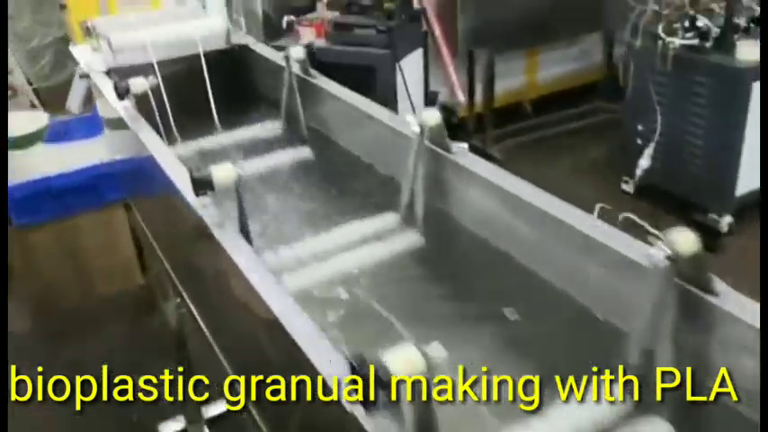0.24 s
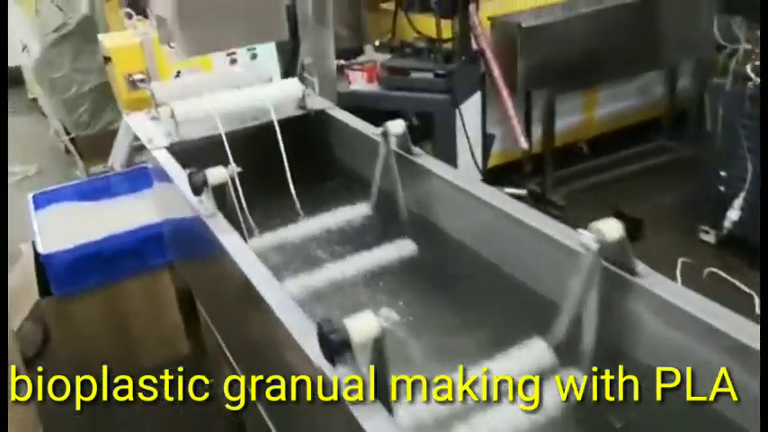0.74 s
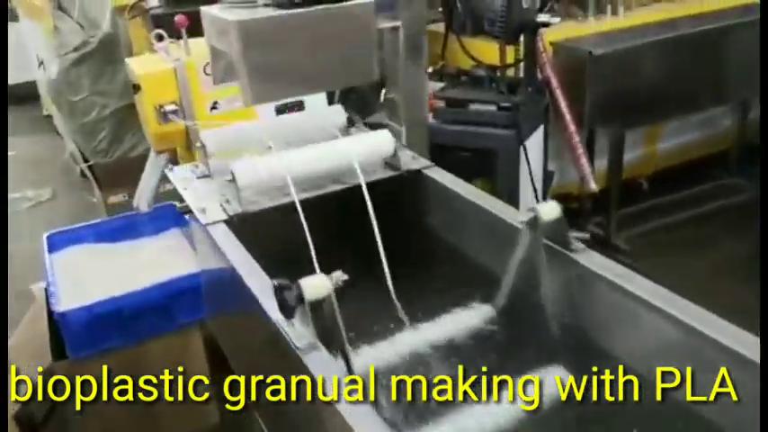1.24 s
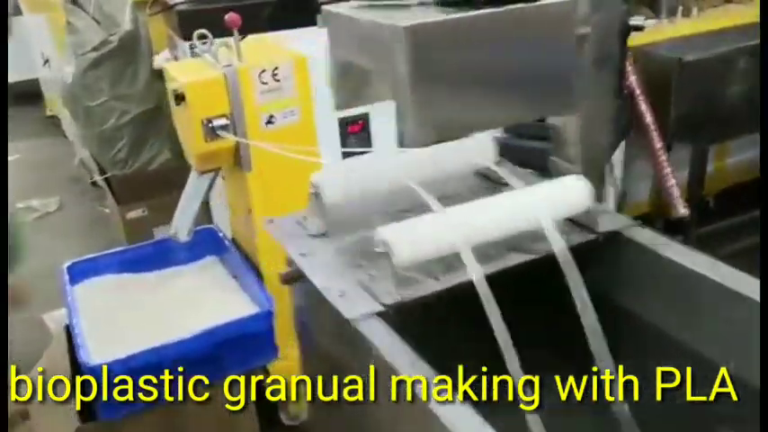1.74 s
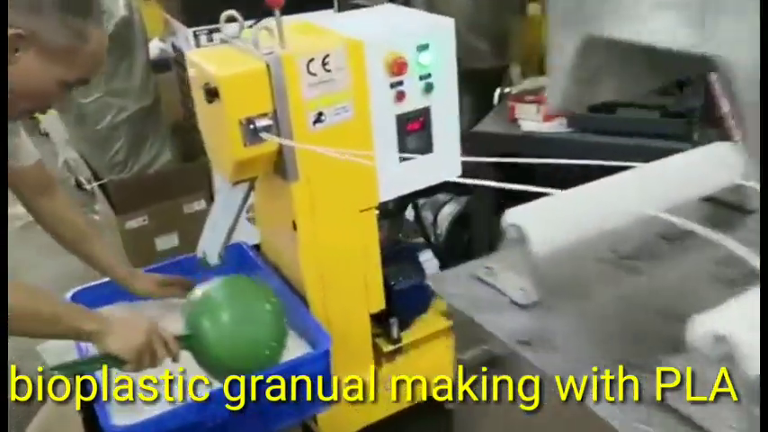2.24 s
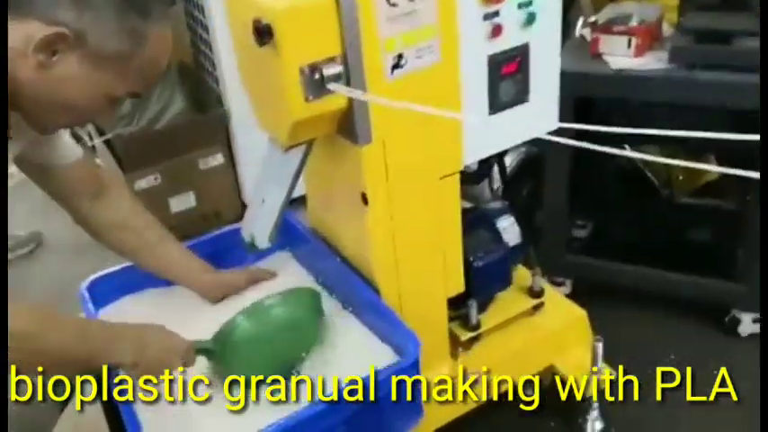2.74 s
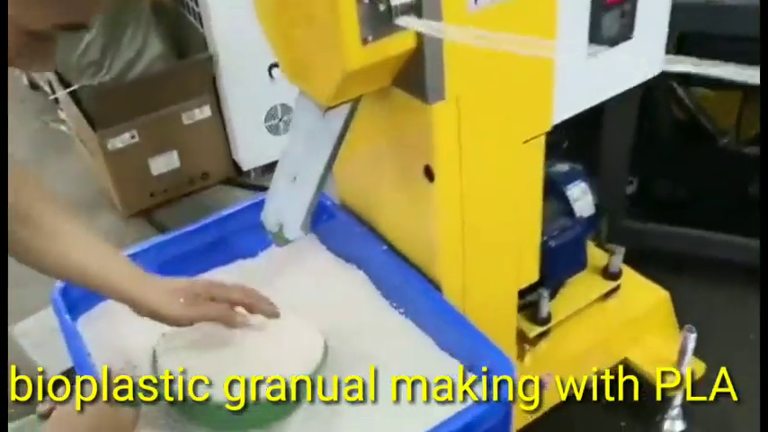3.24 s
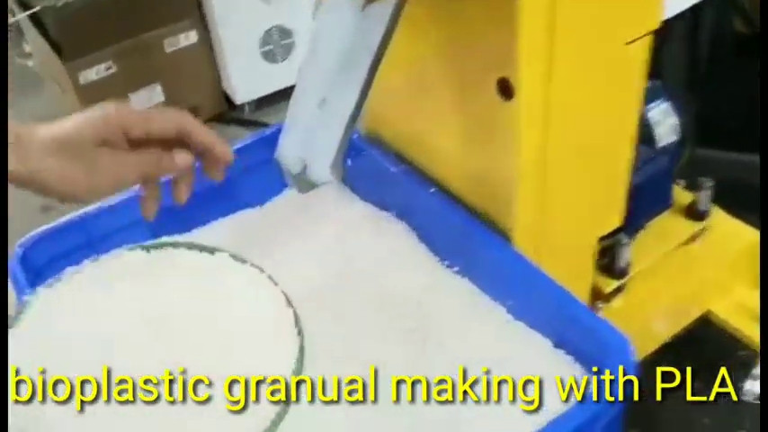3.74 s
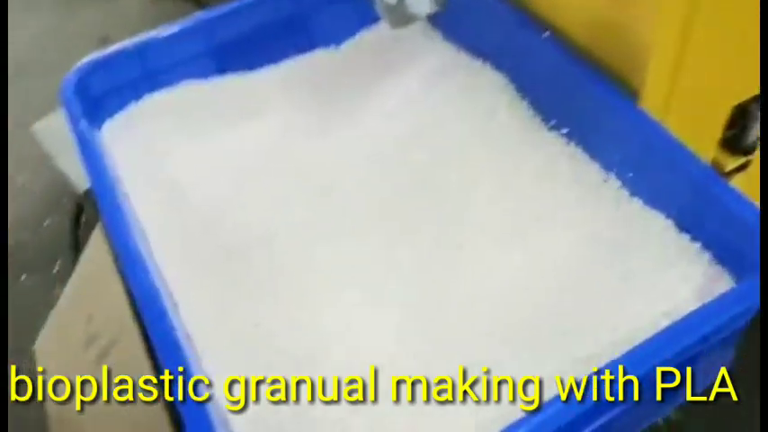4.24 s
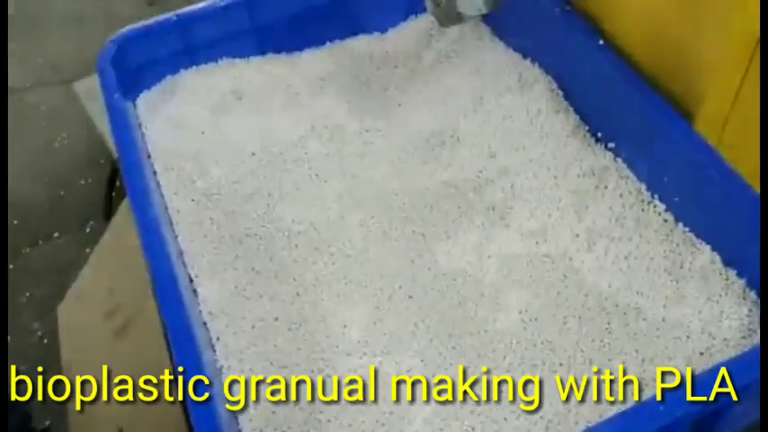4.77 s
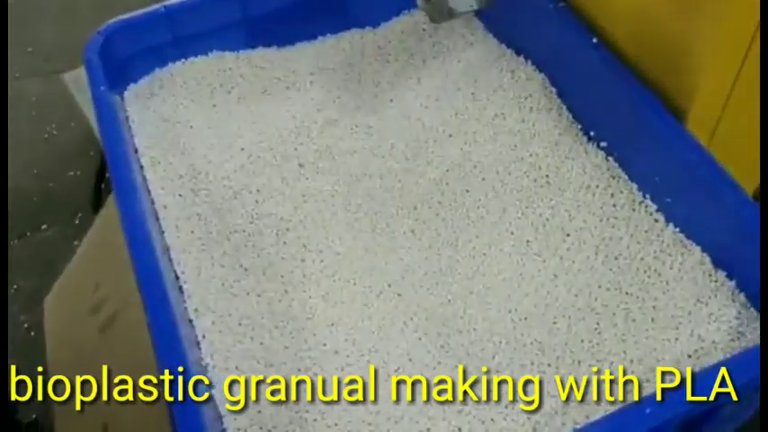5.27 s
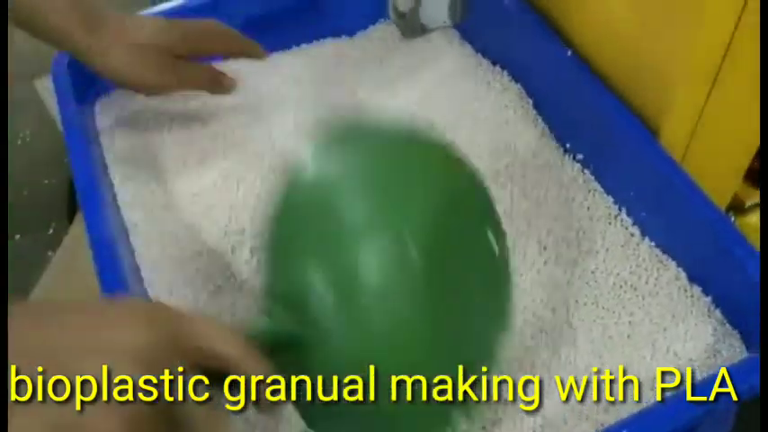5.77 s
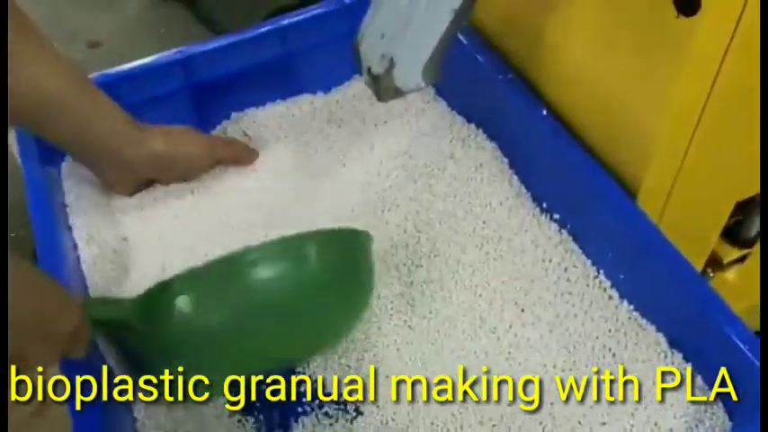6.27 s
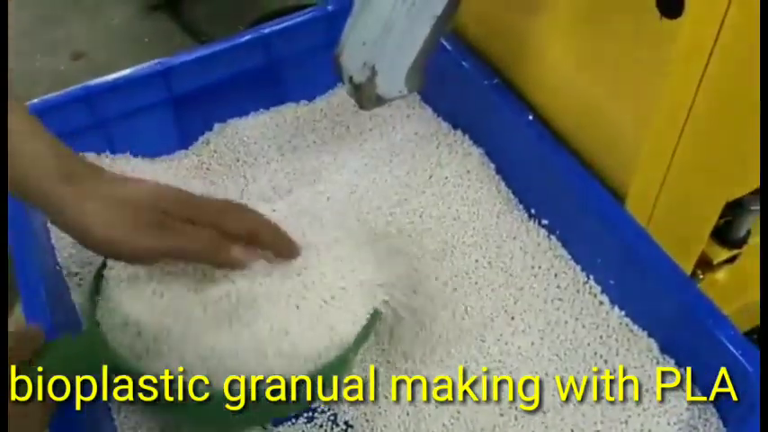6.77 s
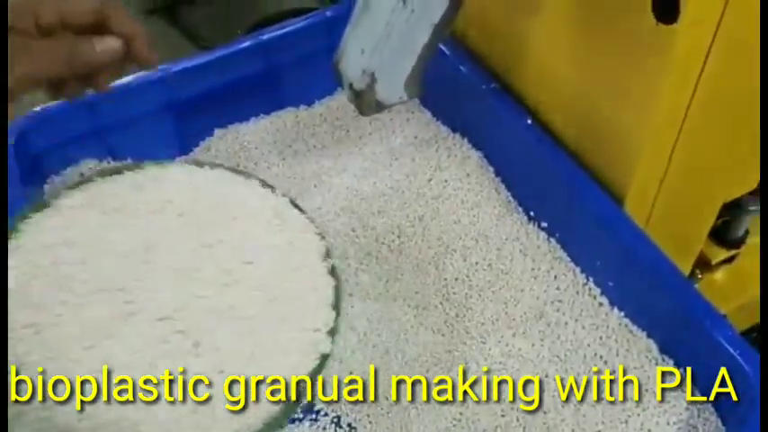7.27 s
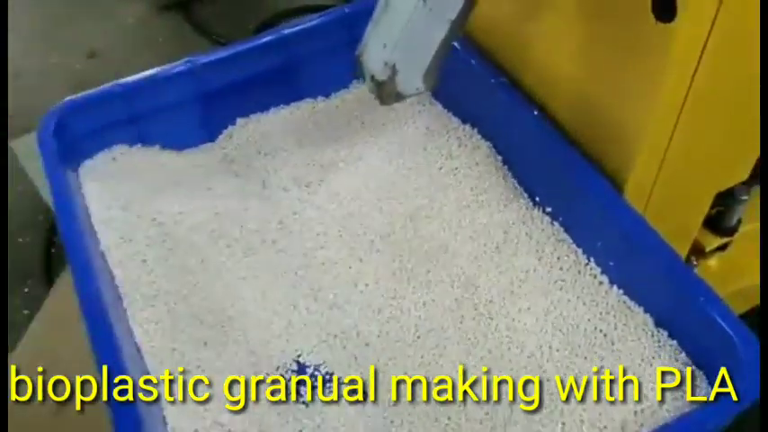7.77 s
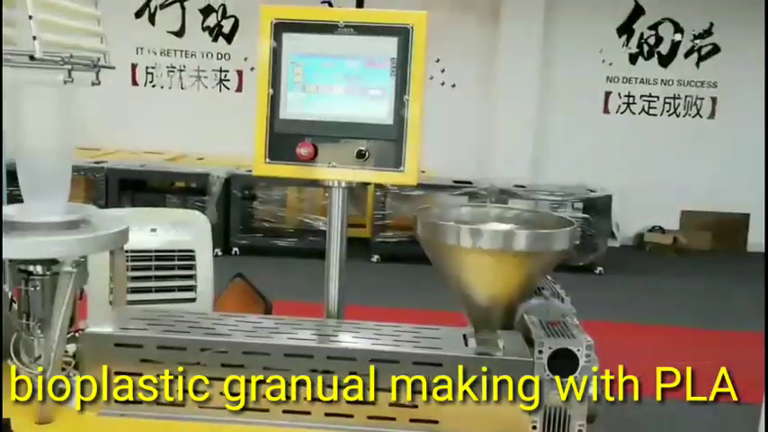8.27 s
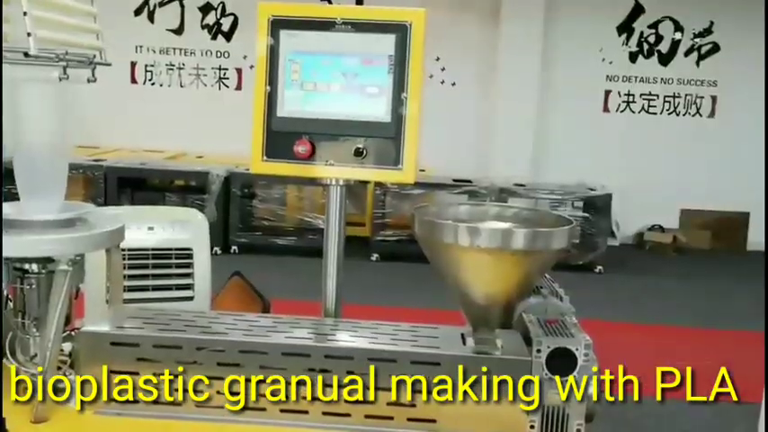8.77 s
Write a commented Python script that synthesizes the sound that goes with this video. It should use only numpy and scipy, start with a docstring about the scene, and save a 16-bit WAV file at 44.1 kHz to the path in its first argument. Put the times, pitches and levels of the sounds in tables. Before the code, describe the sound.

The microphone moves up to a plastic pellet cutter, whose rough chopping roar and motor whine swell over the low rumble of a factory. A fine rattle of falling pellets runs through it, joined by dull bumps, a few tiny squeals and short crunches as pellets are scooped. Everything stops abruptly near the end. After a moment of silence, a softer machine follows with a pulsing hum, fan noise and a faint high whistle.

```python
"""The harsh roar and whine of a strand pelletizer come first, over the rumble of a factory hall, and
grow as the listener walks up to it. Rotor blades chop plastic strands: the periodic blows give harmonic
tones and shake the housing. The motor sings, pellets ring a steel chute and a scoop digs into the bin.
After a short silence an extruder is heard: a throbbing hum, a fan and its inverter's thin whistle."""
import sys
import numpy as np
from scipy import signal
from scipy.fft import rfft, irfft
from scipy.io import wavfile
from scipy.ndimage import uniform_filter1d, map_coordinates

SR = 44100
rng = np.random.default_rng(int(sys.argv[2]) if len(sys.argv) > 2 else 0)


def waveform_to_disk(signal):
    """Save audio, clipped to [-1, 1], as 16-bit WAV at the path in sys.argv[1]."""
    frames = np.transpose(np.atleast_2d(signal))
    scaled = np.clip(frames, -1, 1) * 32767
    samples = np.round(scaled).astype(np.int16)
    wavfile.write(sys.argv[1], SR, samples)


N = 397341
TIME = np.arange(N) / SR
FREQS = np.arange(N // 2 + 1) * SR / N
# the walk up to the cutter and down to the bin: (time [s], distance [m])
PATH = [(0, 3), (1.1, 2.3), (2, 1.9), (2.6, 1.03), (3.4, 0.95), (4.6, 0.71), (6.9, 0.52), (8.08, 0.7)]


def undb(db):
    """Decibels to amplitude ratio."""
    return np.exp(np.asarray(db) * np.log(10) / 20)

def unit(x):
    """Normalisation to rms 1."""
    return x / np.sqrt(np.mean(x ** 2))

def curve(table):
    """Linear interpolation of (time [s], value) rows."""
    return np.interp(TIME, *np.transpose(table))

def drift(rate):
    """Smooth random modulation: spread near 1, `rate` new values a second."""
    steps = rng.standard_normal(4096)
    coarse = TIME[::32]
    return np.interp(TIME, coarse, map_coordinates(steps, [coarse * rate + 4], mode="wrap"))

def bell(s, length):
    """Gaussian pulse of height 1 at time s."""
    return np.exp(-2 * ((TIME - s) / length) ** 2)

def swells(table):
    """Envelope of superposed Gaussian pulses."""
    return sum(undb(db) * bell(s, length) for s, length, db in table)

def low_pass(x, hz):
    """Steep elliptic low-pass."""
    return signal.sosfilt(signal.ellip(16, .1, 90, hz, fs=SR, output="sos"), x)

def colour(x, spectrum):
    """Spectral shaping to rms 1, rolling off beyond the table's ends."""
    hz, db = np.transpose(spectrum)
    f = np.maximum(FREQS, 1)
    gain = undb(np.interp(np.log(f), np.log(hz), db))
    skirts = np.minimum(f / hz[0], 1) ** 2 * np.minimum(hz[-1] / f, 1) ** 4
    return unit(irfft(rfft(x) * gain * skirts, N))

def pan(db):
    """Gains for a level difference, left minus right."""
    return undb(np.array([[.5], [-.5]]) * db)

def tone(cycles, pan_db, lead=0):
    """A sinusoid reaches two microphones with a level difference and a phase lead [rad]."""
    angle = 2 * np.pi * ((cycles + rng.random()) % 1) + np.array([[.5], [-.5]]) * lead
    return np.sqrt(2) * pan(pan_db) * np.cos(angle)

def diffuse_noise(merge_hz):
    """A diffuse field is coherent at two microphones in the bass, incoherent well above merge_hz."""
    apart = np.pi / 4 * FREQS ** 2 / (FREQS ** 2 + merge_hz ** 2)
    mid, side = rfft(rng.standard_normal((2, N)))
    return irfft(mid * np.cos(apart) + np.array([[1], [-1]]) * side * np.sin(apart), N)

def clicks(per_s, spread_db):
    """Shot noise: independent tiny impacts of uneven size."""
    hit = rng.random((2, N)) < per_s / SR
    polarity = np.sign(rng.standard_normal((2, N)))
    size_db = spread_db * np.minimum(rng.exponential(size=(2, N)), 5)
    return unit(hit * polarity * undb(size_db))

def patchy_bands(x, spread_db):
    """Amplitude modulation: narrow bands swell and fade at random, giving a patchy, shimmering colour."""
    bands = signal.stft(x, nperseg=1024)[2]
    chance = rng.standard_normal(bands.shape[1:])
    chance = uniform_filter1d(uniform_filter1d(chance, size=3, axis=0), size=4, axis=1)
    return unit(signal.istft(bands * undb(spread_db * unit(chance)), nperseg=1024)[1][:, :N])

def reflections(x, share=0.32, drift_s=0.000225):
    """Comb filtering: echoes off steel panels change their delay as the listener moves."""
    out = x.copy()
    for channel in range(2):
        for delay_s in rng.uniform(.002, .016, 3):
            out[channel] += share * np.interp(TIME - delay_s - drift_s * drift(2), TIME, x[channel])
    return unit(out)

def distance_law(at_1m_db, loss_db):
    """Level [dB] along the walk: each doubling of distance costs loss_db."""
    return at_1m_db - loss_db * np.log2(curve(PATH))

def sided(pan_db, diffuse_m=3.5):
    """Reverberation evens out the left-right difference [dB] with distance."""
    return pan_db / (1 + (curve(PATH) / diffuse_m) ** 2)

def hall(flicker_db=1.47):
    """The hall's machines sum to a diffuse rumble, which sinks as the listener leans over the bin."""
    # rumble spectrum: (frequency [Hz], relative level [dB])
    spectrum = [(20, -15.5), (45, -6), (70, -2.5), (97, 3), (130, -1.5), (190, -0.5), (300, -5),
                (450, -8.5), (560, -13)]
    # rumble along the walk: (time [s], level [dB])
    levels = [(0, -30.5), (3, -29.5), (4.9, -34.5), (5.7, -31.5), (6.7, -33.2), (8.08, -32)]
    return colour(diffuse_noise(merge_hz=263), spectrum) * undb(curve(levels) + flicker_db * drift(12))

def drive_whistle(carrier_hz=4054, spacing_hz=60, level_db=-53):
    """Modulation sidebands flank a motor drive's switching tone; each line fades on its own."""
    lines_hz = carrier_hz + spacing_hz * np.arange(-2, 3)
    return sum(undb(level_db + 2 * drift(3.1)) * tone(hz * TIME, pan_db=-3) for hz in lines_hz)

def hum(hum_hz=126, partner_hz=149, rest_db=-46.5, edge_s=.02, flutter_db=2):
    """Beating: two unsteady low tones make a rough hum that comes in throbs."""
    # throbs of the extruder: (start [s], length [s], level [dB])
    throbs = [(8.429, 0.017, -30), (8.497, .11, -29.5), (8.647, 0.206, -32), (8.893, .12, -34.5)]
    envelope = undb(rest_db)
    for s, length, db in throbs:
        inside_s = np.minimum(TIME - s, s + length - TIME)
        envelope += undb(db) * np.clip(.5 + inside_s / edge_s, 0, 1)
    lower, upper = (tone(hz * TIME + 0.12 * drift(30), pan_db=0) for hz in (hum_hz, partner_hz))
    return (lower + undb(-2) * upper) * envelope * undb(flutter_db * drift(45))

def extruder(fan_db=-32):
    """Broadband fan noise lies under the hum and the line spectrum of an inverter."""
    # fan noise: (frequency [Hz], relative level [dB])
    spectrum = [(25, -7), (70, -16), (110, -5.5), (190, -8), (320, -6), (430, -9), (520, -27.5),
                (780, -20.5), (950, -18), (2400, -17), (3100, -22), (3800, -34.5), (5900, -31), (7000, -35),
                (8200, -35)]
    # carrier, sidebands and one low line: (frequency [Hz], level [dB], left minus right [dB])
    lines = [(672, -53, -7), (7790, -55, -12), (7833, -58, 0), (7860, -52, -13), (7972, -49, -18),
             (8000, -54, -14), (8028, -45, -9), (8141, -49, 0)]
    fan = colour(diffuse_noise(merge_hz=596), spectrum) * undb(fan_db) * pan(-5.5)
    waver = .05 * drift(14)
    return fan + hum() + sum(undb(db) * tone(hz * TIME + waver, side) for hz, db, side in lines)

def crunches():
    """Pellets shoved about in the bin collide; the dense impacts fuse into a crunch."""
    # shoves: (time [s], length [s], level [dB])
    shoves = [(4.81, 0.11, -25.5), (4.96, 0.1, -26), (5.82, 0.073, -20), (6.22, 0.11, -27.5),
              (6.38, 0.063, -31.5), (7.3, 0.23, -32)]
    # impact spectrum: (frequency [Hz], relative level [dB])
    spectrum = [(400, -12.5), (800, -11), (1500, 17), (2600, 4.5), (4000, 5), (7000, -11)]
    return colour(clicks(per_s=2300, spread_db=3.5), spectrum) * swells(shoves)

def knocks():
    """Damped oscillation: the scoop, or a hand on the microphone, excites one low mode a knock."""
    # dull blows: (time [s], frequency [Hz], 60 dB decay time [s], initial level [dB])
    blows = [(3.017, 105, 0.2, -19), (4.133, 91, 0.097, -17), (4.24, 45, 0.21, -20.5),
             (4.31, 38, 0.32, -25), (5.607, 64, 0.51, -25), (5.815, 245, 0.026, -11.5),
             (5.844, 183, 0.043, -10.5)]
    out = np.zeros(N)
    age = TIME[:SR // 4]
    for s, hz, t60, db in blows:
        start = int(s * SR)
        out[start:start + len(age)] += undb(db - 60 * age / t60) * np.sin(2 * np.pi * hz * age)
    return out

def squeals(hz=7395):
    """A high tone with random phase modulation sounds in brief bursts."""
    # squeals at the cutter: (time [s], length [s], level [dB])
    bursts = [(4.13, 0.068, -34), (4.37, 0.033, -32), (6.225, 0.056, -26.5), (6.35, 0.044, -31.5),
              (6.405, 0.025, -30), (7.48, 0.044, -38)]
    return swells(bursts) * tone(hz * TIME + 0.29 * drift(80), pan_db=-10.5)

def beam(enter_s, cross_s, loss_db):
    """Directivity [dB]: a beamed tone is weak until the listener steps in front of it."""
    return -loss_db * (1 - np.tanh(2 * (TIME - enter_s) / cross_s)) / 2

def rotor(cuts, blades=16):
    """Modulation at the rotation rate, from a random starting angle."""
    return np.cos(2 * np.pi * (cuts / blades + rng.random()))

def motor(cuts, level_db=-28, flicker_db=1.7):
    """The rotor's load modulates the phase of the motor's magnetic and gear tones."""
    # motor tones: (frequency [Hz], relative level [dB], left minus right [dB], left lead [rad])
    lines = [(660, -10, -3, 1.6), (719.5, -9.5, -9, -.3), (1139.5, -2.5, -4, .3), (1169, -3, -2, -.1),
             (6150, -16, -7, 1), (7393, -22, -5, 0)]
    out = 0
    for hz, db, side, lead in lines:
        gain = undb(db + flicker_db * drift(4.1))
        cycles = hz * TIME + 0.11 * drift(27) + 0.15 * rotor(cuts)
        out += gain * tone(cycles, side, lead)
    return out * undb(level_db + beam(enter_s=2.6, cross_s=0.85, loss_db=15))

def pellets(spray_db, ring_db):
    """Impact excitation: spurts of pellets patter on the heap and ring the chute's modes."""
    # steel chute modes: (frequency [Hz], bandwidth [Hz], relative level [dB])
    modes = [(4614, 53, -3.5), (5080, 63, -1.5), (5473, 190, -5), (5748, 160, 5)]
    # pellets hitting pellets: (frequency [Hz], relative level [dB])
    spectrum = [(4300, -28.5), (4700, -6.5), (5300, -3.5), (6000, -0.5), (6800, -1), (7500, 0)]
    hits = patchy_bands(reflections(clicks(per_s=4000, spread_db=1.5)), spread_db=2)
    response = sum((-1) ** k * undb(db) / (1 + 2j * (FREQS - hz) / width)
                   for k, (hz, width, db) in enumerate(modes))
    ring = unit(irfft(rfft(hits) * response, N)) * undb(ring_db + drift(55))
    spray = colour(hits, spectrum) * undb(spray_db + 1.15 * drift(45))
    return ring + spray

def chopping(cuts, decay_periods=.4, left_lag_s=.00058, direct_db=-5):
    """Each cut snaps a strand and shakes the housing; reverberation smears most of it into a roar."""
    # response of the housing: (frequency [Hz], relative level [dB])
    housing = [(450, -36), (570, -22), (640, 2.5), (730, -6.5), (790, -5.5), (920, -7), (1030, -4),
               (1240, 2.5), (1400, -5.5), (1530, -7), (1750, -1), (1950, -0.5), (2030, 1.5), (2170, -2.5),
               (2480, -3), (2650, -2), (3000, -4.5), (3500, -10), (4100, -11), (4500, -13.5), (5500, -19)]
    envelope = np.exp(-(cuts % 1) / decay_periods) * undb(-3.4 * drift(210))
    snaps = unit(envelope * rng.standard_normal(N))
    direct = undb(direct_db) * np.array([np.roll(snaps, round(left_lag_s * SR)), snaps])
    roar = diffuse_noise(merge_hz=438)
    return colour(patchy_bands(roar + direct, spread_db=4), housing)

def standing_waves(harmonic, fade_db=1.22):
    """Interference [dB]: a blade tone swells at antinodes and drops out at nodes along the walk."""
    # loud and dead spots: (time [s], length [s], harmonic number, level change [dB])
    spots = [(.87, 0.38, 6, 9), (1.32, 0.067, 4, 7), (1.35, 0.19, 6, 14), (1.72, 0.15, 6, -20),
             (2.13, .18, 6, 13), (2.3, 0.57, 3, 6.5), (2.898, 0.79, 4, -9.5), (3.101, 0.47, 6, 7.5),
             (3.359, 0.18, 3, -4.5), (3.42, 0.14, 9, 8.5), (3.9, 0.27, 3, 6), (4.046, .5, 9, -7.5),
             (4.891, 0.58, 3, 2), (6.05, .5, 9, 2.5), (6.15, .9, 3, -15.5), (6.599, .3, 9, -6.5),
             (7.8, .6, 3, -12.5)]
    change_db = sum(db * bell(s, length) for s, length, k, db in spots if k == harmonic)
    return change_db + fade_db * drift(3.19)

def blade_tones(cuts, chop_db, uneven=0.15, beamed_harmonic=5):
    """Periodic cuts give harmonics of the blade rate; unequal blades modulate them once a turn."""
    # strong tones: (harmonic number, level at 1 m [dB], loss per doubling of distance [dB],
    # left minus right [dB], left lead [rad])
    strong = [(3, -35, 1.5, -8, 2), (4, -36, 3, -0.5, 0.92), (5, -24, 0, -6.5, 0.7),
              (6, -35, 2.6, -2, 0.84), (9, -34, 2.5, -14.5, 1.1)]
    # weak tones: (harmonic number, level re chopping [dB], left minus right [dB], left lead [rad])
    weak = [(7, -18.5, -5.5, -0.4), (8, -15, -2.5, 1.5), (10, -9.5, -0.5, 2), (11, -16.5, -13.5, -1.5),
            (12, -19.5, -9.5, -1), (13, -17, -10.5, 5.5), (14, -16, -3.5, 2.5), (15, -21, -0.5, -1)]
    voices = []
    for k, db, loss_db, side, lead in strong:
        level_db = distance_law(db, loss_db) + standing_waves(k)
        if k == beamed_harmonic:
            level_db += beam(enter_s=2.346, cross_s=0.091, loss_db=13)
        voices.append((k, level_db, sided(side), lead))
    voices += [(k, chop_db + db + 2 * drift(2), side, lead) for k, db, side, lead in weak]
    out = 0
    for k, db, side, lead in voices:
        swing = rotor(cuts)
        cycles = k * cuts + 0.067 * swing + 0.27 * drift(2.5)  # walking shifts each tone's phase
        gain = undb(db + drift(60)) * (1 + uneven * swing)
        out += gain * tone(cycles, side, lead + 0.43 * drift(3.19))
    return out

def pelletizer(blade_hz=209.75):
    """The cutter's sources superpose; one rotor phase times the chopping, whine and motor waver."""
    # uneven strand feed: (time [s], length [s], chopping change [dB], spray change [dB])
    surges = [(1.378, .35, 2.5, 2), (4.39, 0.39, 0, 5.5), (4.926, .22, 2.5, 3.5), (5.6, 0.58, 0.7, -1.5)]
    chop_db = distance_law(-23, loss_db=1.88)
    spray_db = distance_law(-33.5, loss_db=2.8)
    ring_db = distance_law(-35, loss_db=8.6)  # the bin's walls shield the chute
    for s, length, chop_change, spray_change in surges:
        chop_db += chop_change * bell(s, length)
        spray_db += spray_change * bell(s, length)
    cuts = blade_hz * TIME + 0.021 * drift(17) + 0.0086 * drift(70)  # the rotor gives under the strands
    chop = chopping(cuts) * undb(chop_db) * pan(-2)
    rattle = pellets(spray_db, ring_db) * pan(sided(-12))
    return blade_tones(cuts, chop_db) + chop + rattle + motor(cuts)

def scene(cutter_end_s=8.0905, extruder_start_s=8.429):
    """Two sound fields in turn, parted by silence: the pelletizer in its hall, then the extruder."""
    at_cutter = pelletizer() + drive_whistle() + crunches() + knocks() + squeals() + hall()
    return low_pass(at_cutter, hz=7460) * (TIME < cutter_end_s) + extruder() * (TIME > extruder_start_s)

def record(dry):
    """Band limiting removes the top of the treble."""
    return low_pass(dry, hz=8430)


dry = scene()
out = record(dry)
waveform_to_disk(out)
```